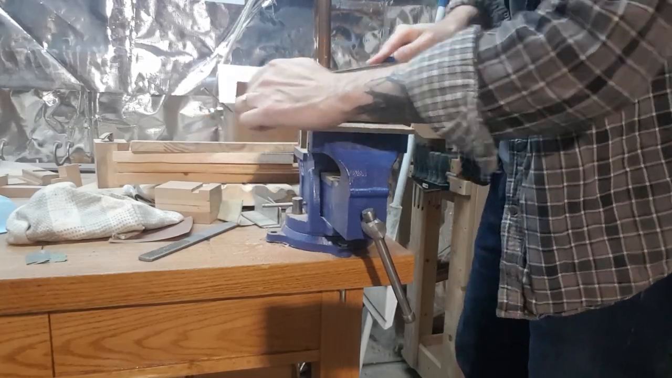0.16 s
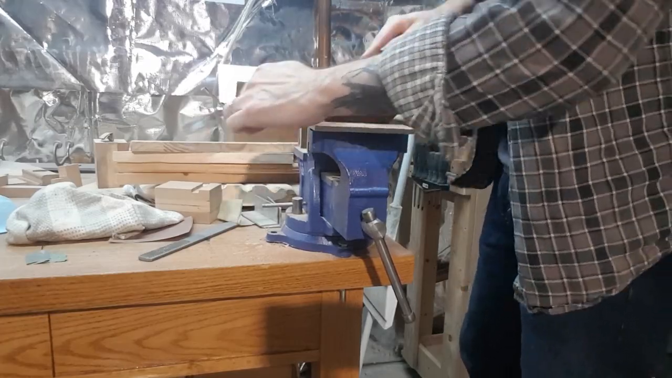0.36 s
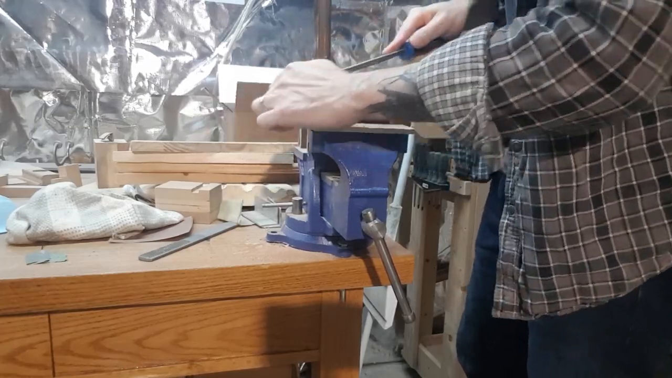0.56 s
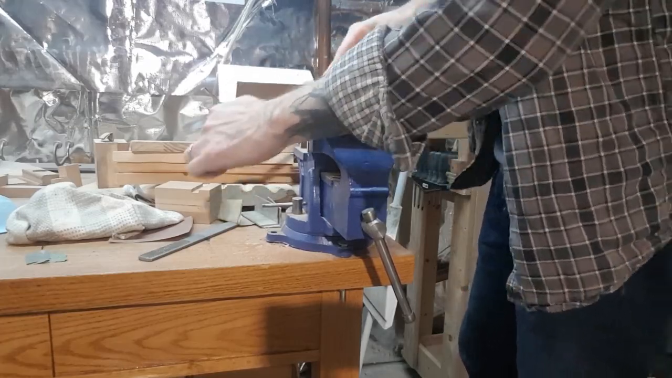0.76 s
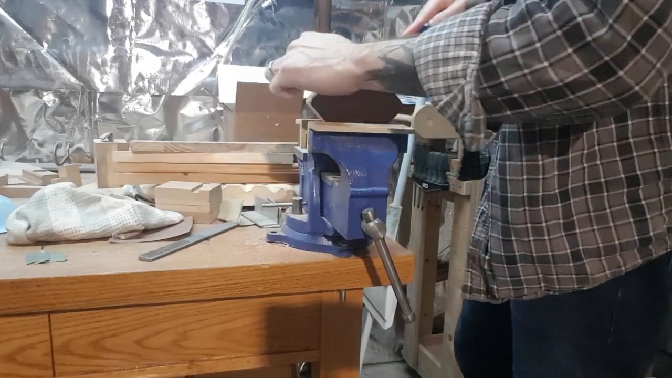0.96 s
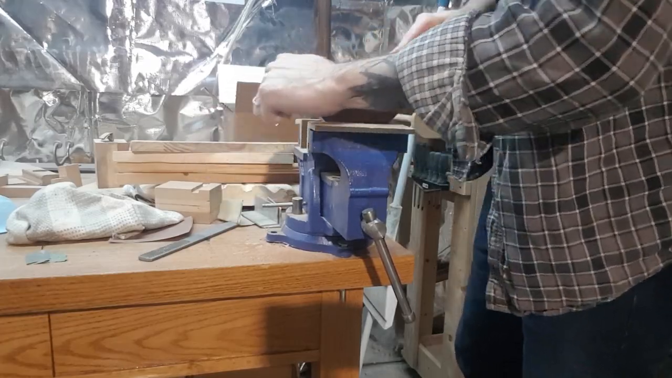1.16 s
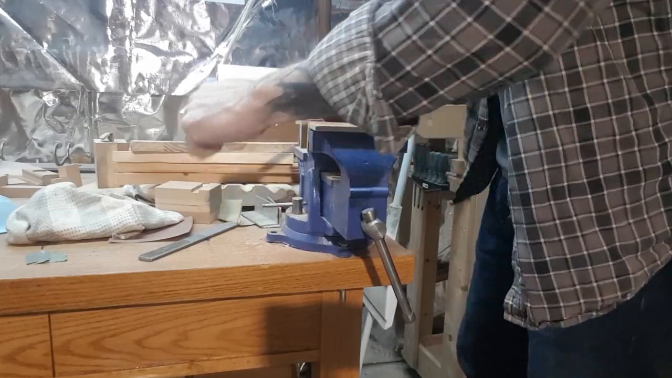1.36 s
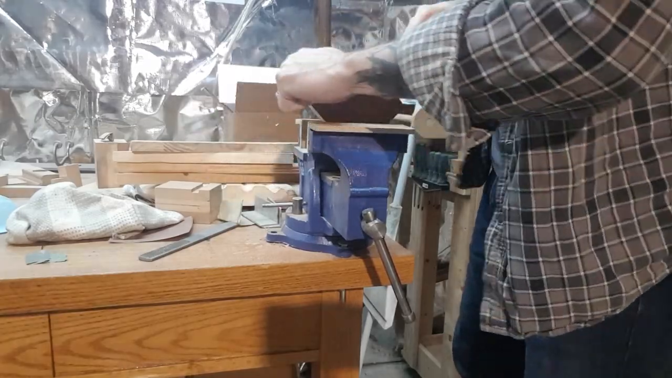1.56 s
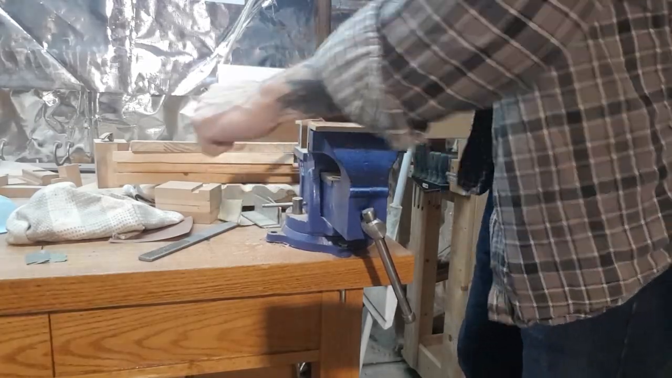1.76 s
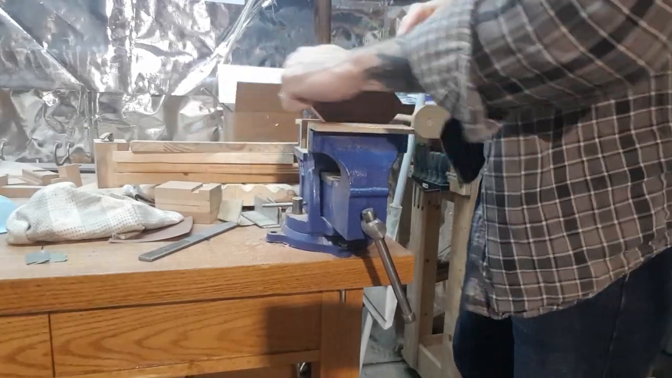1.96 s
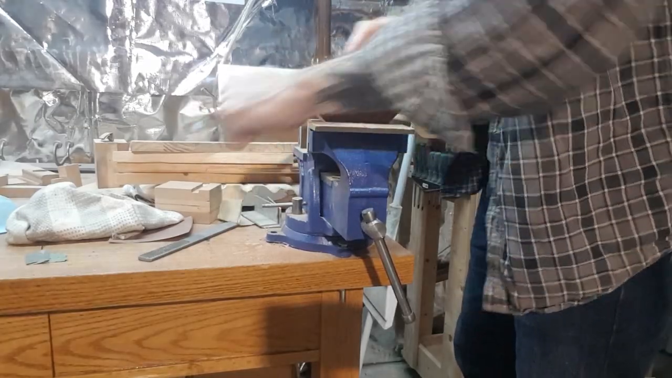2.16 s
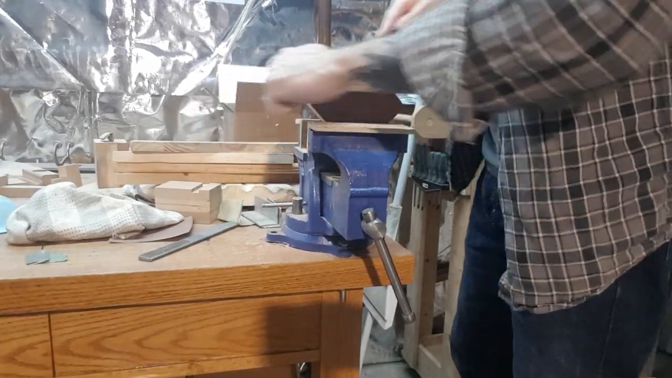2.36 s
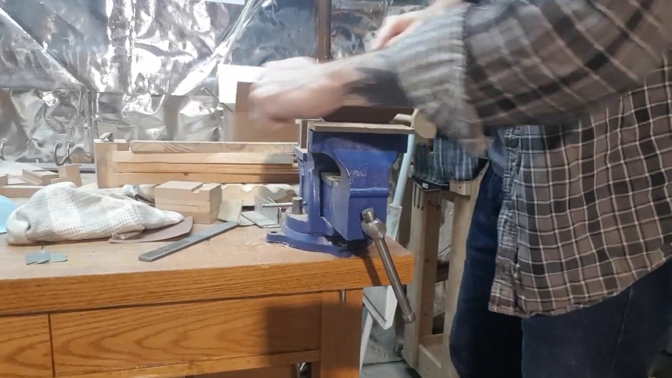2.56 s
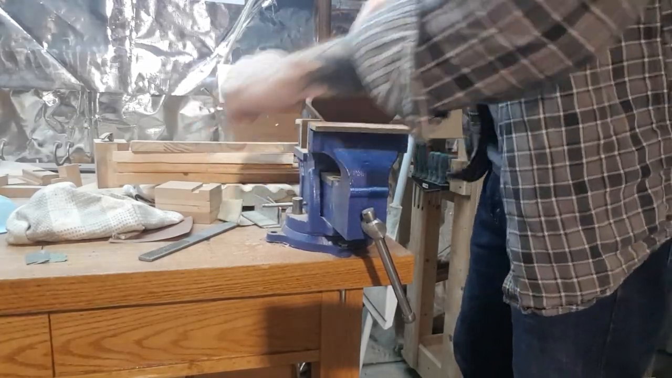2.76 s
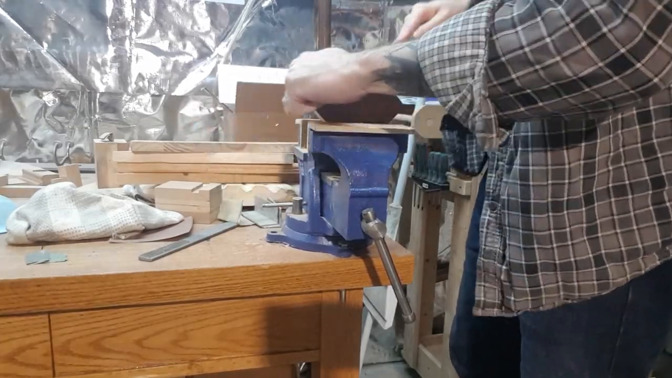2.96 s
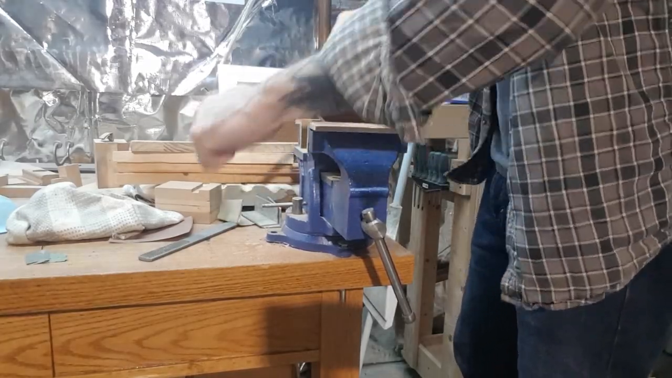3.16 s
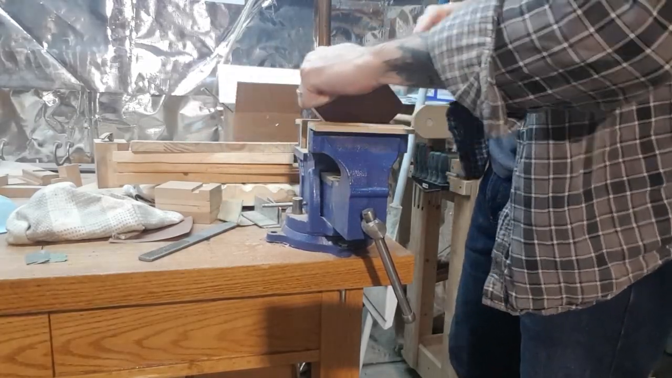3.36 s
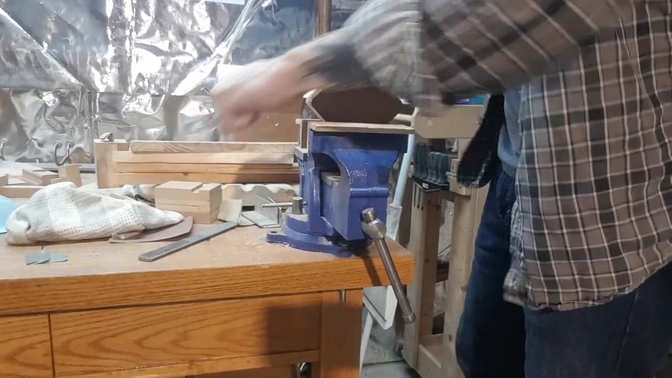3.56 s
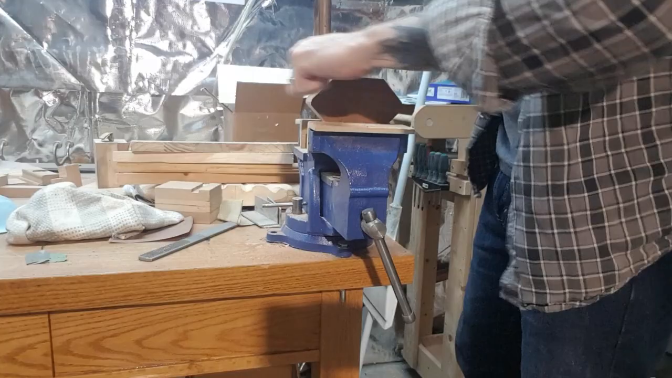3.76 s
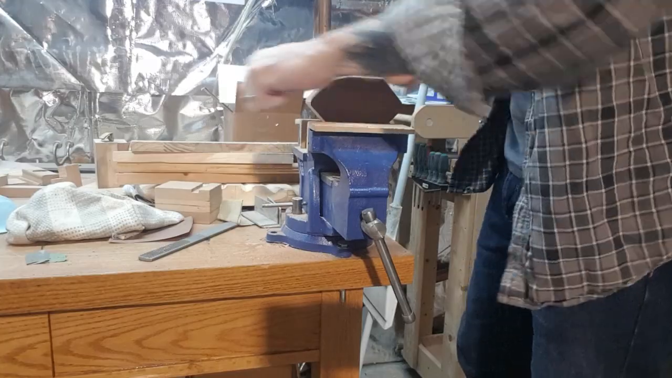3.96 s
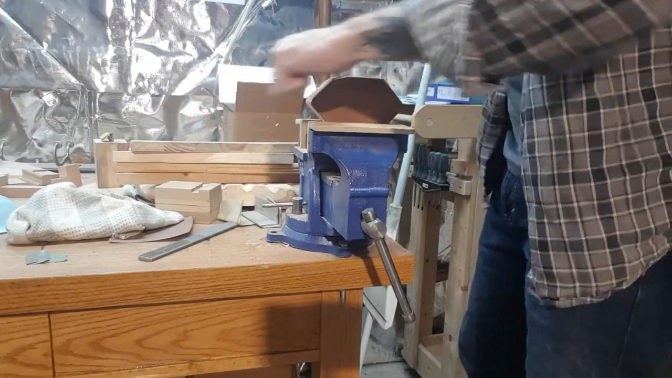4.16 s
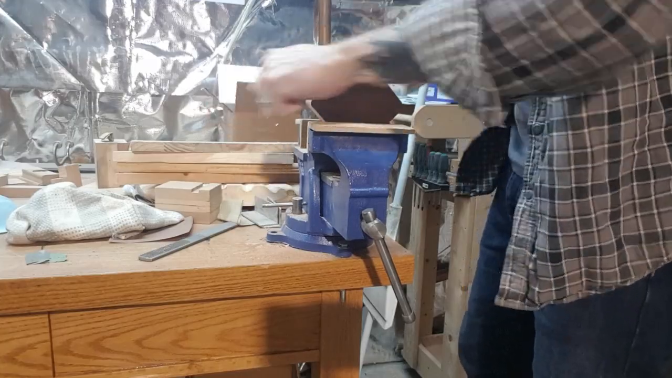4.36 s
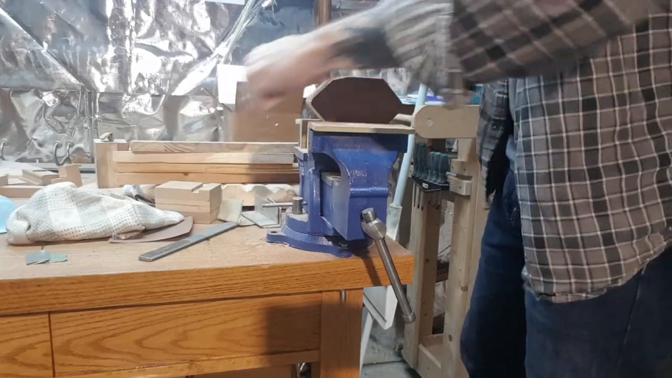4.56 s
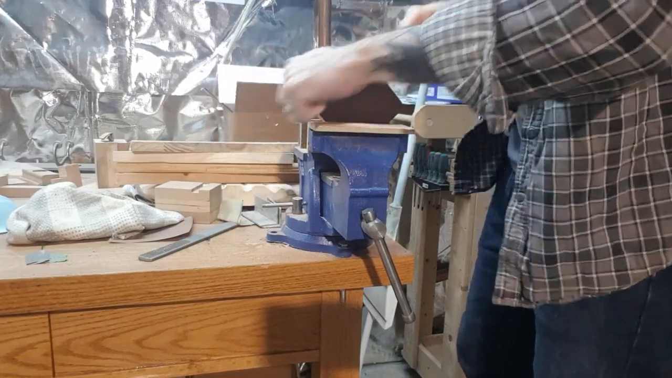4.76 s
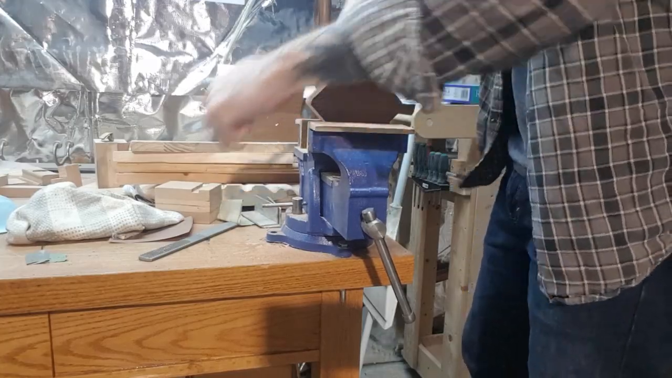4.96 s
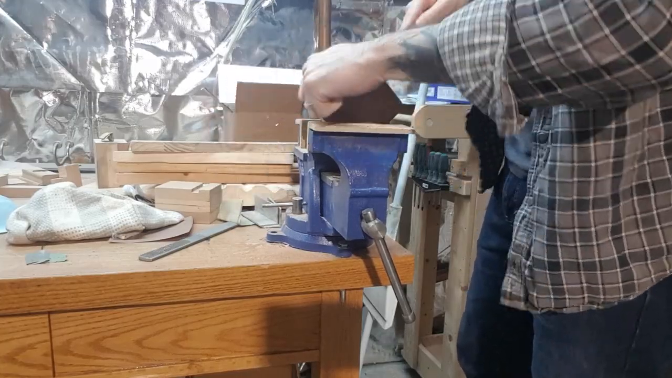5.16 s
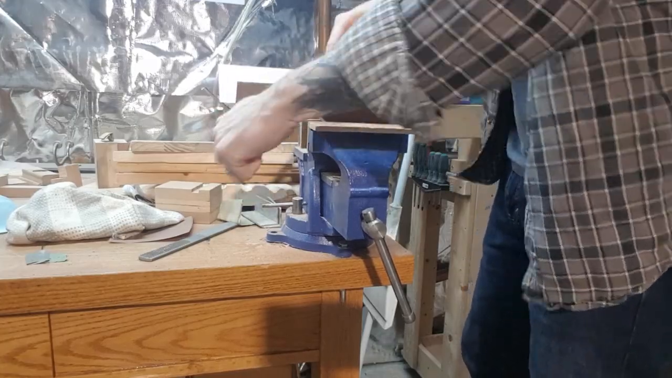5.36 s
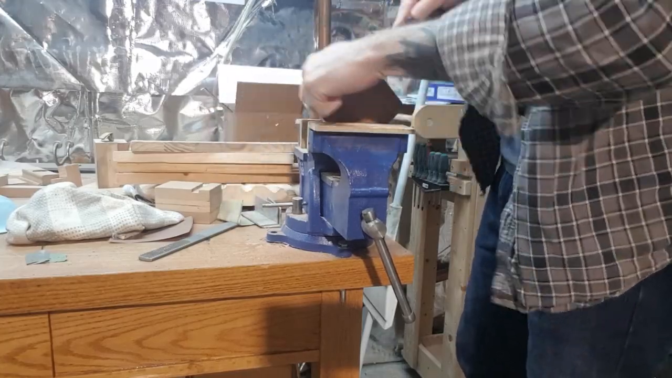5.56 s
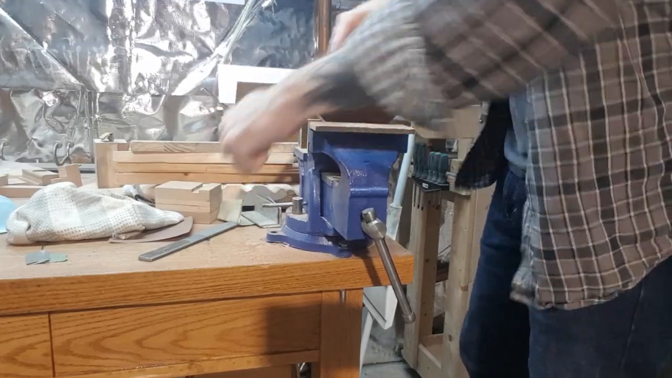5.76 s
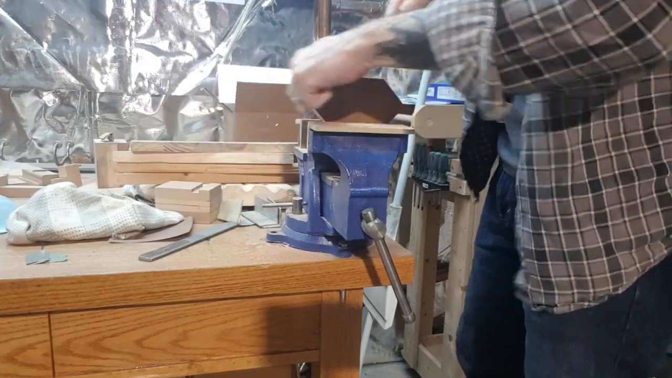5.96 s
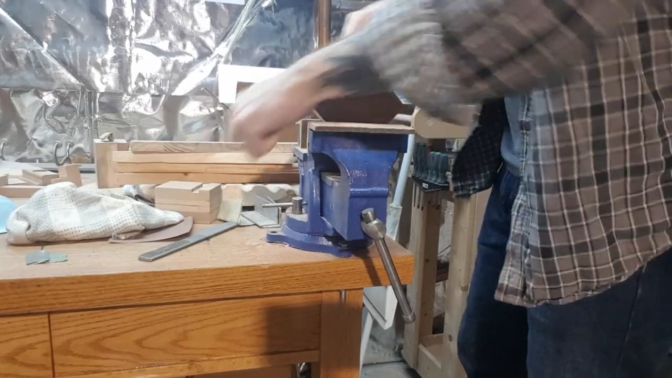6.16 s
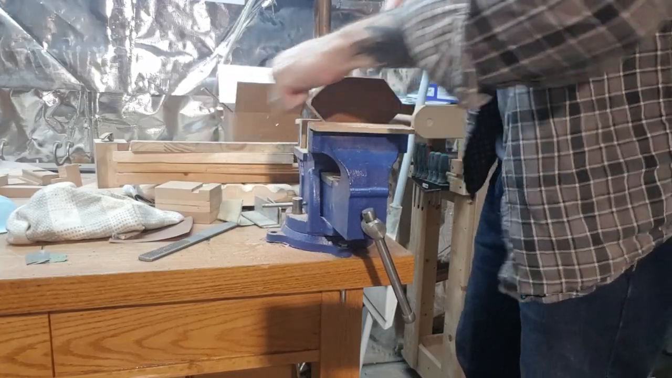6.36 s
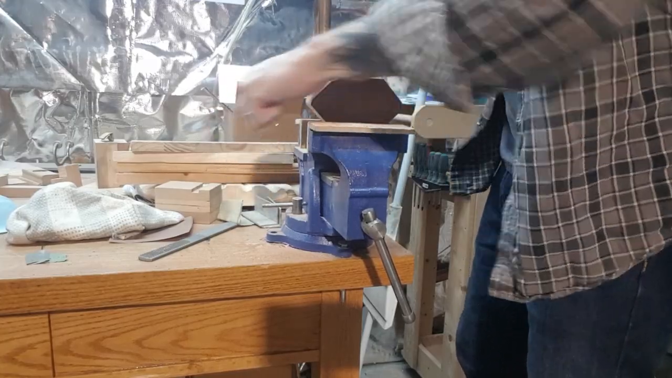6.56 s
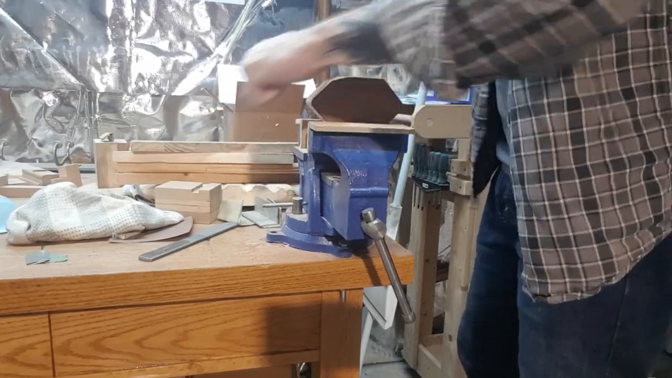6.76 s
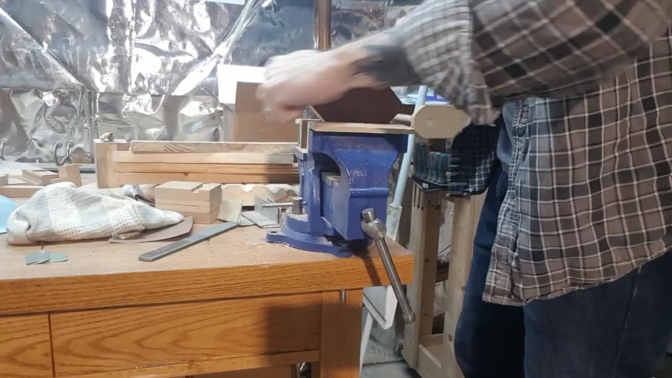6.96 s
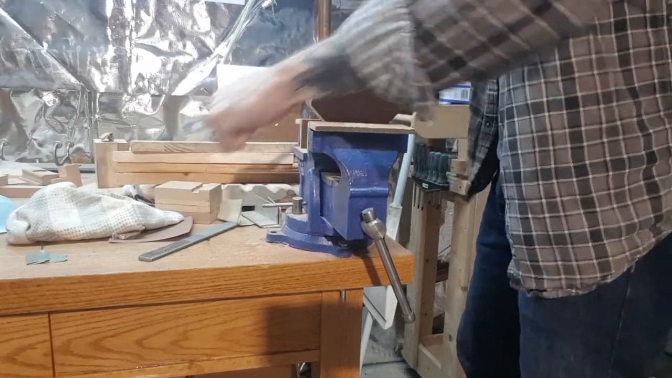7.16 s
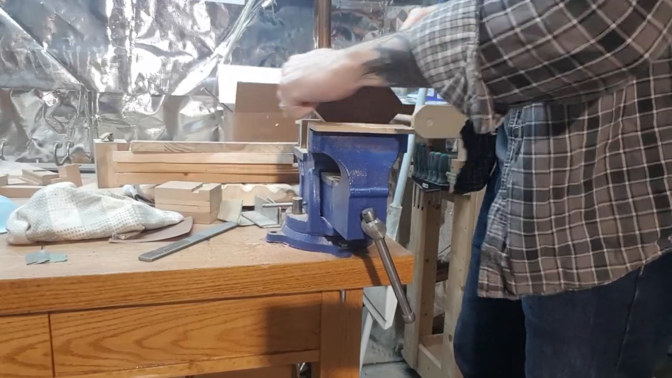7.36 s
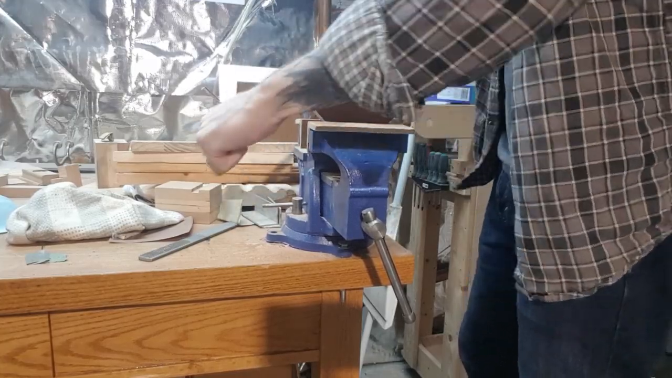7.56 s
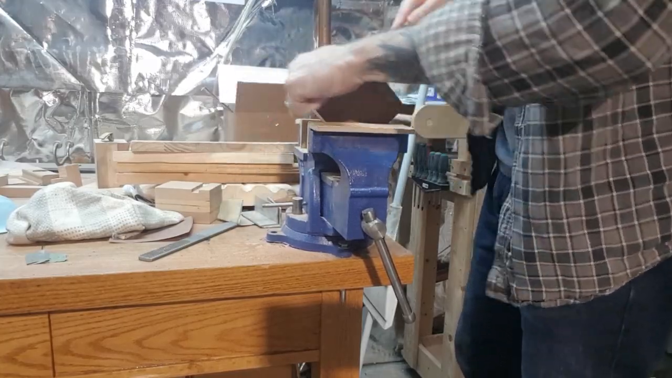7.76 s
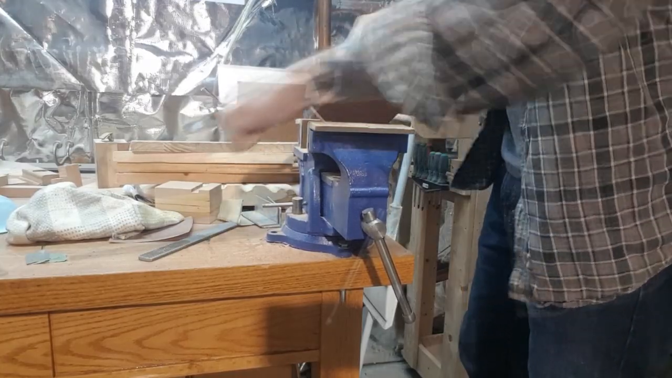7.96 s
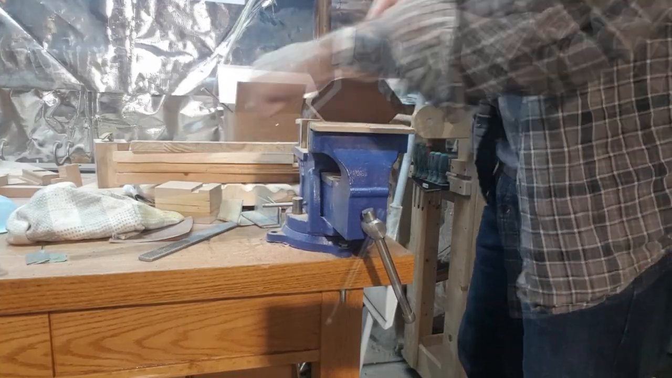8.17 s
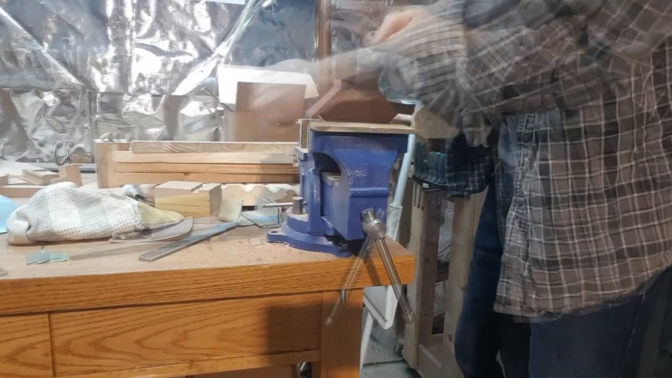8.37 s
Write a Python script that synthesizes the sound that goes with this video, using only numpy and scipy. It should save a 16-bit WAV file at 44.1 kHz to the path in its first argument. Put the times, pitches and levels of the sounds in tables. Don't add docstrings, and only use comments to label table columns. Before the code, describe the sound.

Steady back-and-forth filing on wood in a small workshop: hollow knock, short coarse rasp, brief pause, about two strokes a second.

```python
import sys
import numpy as np
from scipy import signal
from scipy.fft import rfft, irfft
from scipy.io import wavfile
from scipy.ndimage import uniform_filter1d

SR = 44100
rng = np.random.default_rng(int(sys.argv[2]) if len(sys.argv) > 2 else 0)


def transcribe(signal):
    frames = np.atleast_2d(signal).T
    limited = np.clip(frames, -1, 1)
    pcm = np.round(limited * 32767).astype(np.int16)
    wavfile.write(sys.argv[1], SR, pcm)


def field_ratio(decibels):
    return 10 ** (np.asarray(decibels, dtype=float) / 20)


N = 374850

# f/Hz, density level/dB
AIR_COLOUR = [(15, -69), (25, -26), (73, -18), (86, -3), (107, 2), (129, -5), (253, -51), (763, -22),
              (1030, -15), (9590, -35), (15600, -34)]
# f/Hz, likeness [0..1]
EAR_LIKENESS = [(60, .98), (300, 0.92), (700, 0.2), (1500, 0.07), (15000, .05)]
# f/Hz, t60/s
ROOM_DECAY = [(100, 0.83), (500, 0.22), (2000, 0.3), (6000, 0.2), (15000, 0.47)]
# t/s, level/dB
CHIRPS = [
    (1.3994, -78),
    (1.4755, -67),
    (1.5938, -77),
    (1.95, -73),
    (3.6651, -71),
    (3.7693, -72),
    (4.1275, -75),
    (4.2298, -82),
    (4.5386, -67),
]
# t/s, level/dB
PUSHES = [(.21, -49), (.33, -47), (.66, -40), (1.2, -46), (1.73, -38.5), (2.08, -44), (2.2, -49),
          (2.63, -36.5), (3.05, -49), (3.15, -40.5), (3.62, -47), (3.93, -46.5), (4.05, -56), (4.45, -40),
          (4.66, -46), (4.9, -42), (5.25, -45), (5.74, -38), (6.08, -49), (6.22, -42), (6.67, -45),
          (6.94, -60), (7.05, -48), (7.15, -66), (7.49, -33), (7.98, -41), (8.36, -59), (8.49, -46)]
# f/Hz, width/Hz, level/dB, left minus right level/dB
LEG_MODES = [(49, 8, -10.5, -12), (56.4, 7.3, 5, 1.5), (72.2, 74, 1.5, 2)]
# f/Hz, width/Hz, level/dB, left minus right level/dB
APRON_MODES = [(256.3, 7.3, 2.5, 2.2), (346, 25, -1.5, 2), (468, 59, 0, 2)]
# f/Hz, width/Hz, level/dB, left minus right level/dB
HANDLE_MODES = [(796, 4.9, -11, 0), (1993, 5.1, -21, 0.043)]
# f/Hz, width/Hz, level/dB, left minus right level/dB
FACE_MODES = [(722, 25, -4, 1.4), (1080, 17, -10, 3), (817, 73, -12.5, 2.5)]
# f/Hz, width/Hz, level/dB, left minus right level/dB
JAW_MODES = [(372.3, 10, -5, 1.5), (458, 35, -5.5, 1.5)]
# f/Hz, width/Hz, level/dB, left minus right level/dB
BODY_MODES = [(58, 20, -21, 0), (110, 15, -16, 1), (135, 15, -12, 0), (225, 20, -15, 1), (260, 20, -7, 2),
              (287, 20, -10, 2), (355, 25, -10, 2), (410, 18, -4, 3), (435, 22, -3, 5), (490, 25, -9, -3),
              (567, 30, -13, 1), (650, 25, -7, 10), (685, 25, -3, 4), (745, 25, 0, 0), (773, 25, -4, -5),
              (843, 28, -5, 6), (885, 30, -8, 0), (975, 30, -8, 4), (1027, 25, -5, 9), (1057, 20, -6, 0),
              (1182, 40, -14, 6), (1574, 50, -15, 4), (1970, 50, -19, 5), (2090, 90, -22, 1),
              (2270, 50, -24, 4), (2980, 200, -27, 0), (3490, 250, -23, 0), (3900, 250, -25, 1),
              (6550, 300, -32, -3), (13000, 900, -45, 0)]
# f/Hz, width/Hz, level/dB, left minus right level/dB
DRAWER_MODES = [(195, 11, -14, .1), (519.8, 9.2, -7.5, 0.12), (1358, 140, -23.5, 3.6), (1509, 48, -18, 2.1),
                (1675, 82, -19, 1.1), (1750, 88, -22.5, 2.5)]
# f/Hz, density level/dB
SCRAPE_COLOUR = [(1350, -39.5), (2200, -1), (2600, -2.5), (2900, 0.5), (3570, -8), (4200, -10),
                 (4500, -11.5), (6060, -21), (6610, -19.5), (7460, -19.5), (9040, -28), (11000, -28),
                 (13200, -35), (15600, -27)]
# t/s, blow level/dB, steel tick level/dB re blow, vise jaws level/dB re blow
LANDINGS = [(0.168, -27.5, -34, -5.5), (0.509, -32.5, -21, -4.5), (1.117, -32.5, -25, -9.5),
            (1.613, -36, -28, -6.5), (2.038, -32.5, -26, -1.5), (2.458, -22.5, -31, -6),
            (2.954, -26, -28, -6), (3.409, -34, -24, -7.5), (3.863, -23, -41, -12),
            (4.3, -31.5, -23.5, -7.5), (4.724, -24, -27.5, -9.5), (5.192, -22, -29, -17),
            (5.625, -31.5, -26, -14), (6.056, -24.5, -31, -12.5), (6.475, -28.5, -35, -6),
            (6.933, -19.5, -32.5, -9.5), (7.372, -28.5, -32, -6), (7.853, -29, -28, -18),
            (8.3, -28, -28.5, -7)]
# full cut t/s, lift t/s (both from landing), full pressure level/dB,
# first touch level/dB, bite level/dB re pressure
STROKES = [ (0.013, 0.13, -24.5, -21, -21), (0.13, .24, -24, -41, -15.5), (0.12, 0.23, -24, -37, -16.5),
           (.1, 0.17, -22.5, -43, -15), (.11, 0.19, -21.5, -39, -15.5), (0.13, 0.24, -24, -41, -13.5),
           (0.12, 0.19, -22.5, -40, -13.5), (0.11, 0.2, -23.5, -43.5, -14.5), (0.11, 0.19, -24, -39.5, -15),
           (0.099, 0.18, -22, -38.5, -15), (0.11, 0.2, -23, -38, -13), (0.11, 0.17, -22, -33.5, -13.5),
           (0.095, 0.17, -22, -47, -13.5), (0.092, 0.15, -22, -41.5, -12.5),
           (0.11, 0.19, -23.5, -40, -12.5), (0.12, 0.18, -22.5, -36.5, -15.5),
           (0.098, .19, -24.5, -37, -15), (0.11, .17, -24.5, -39.5, -16), (0.12, 0.87, -29, -42.5, -18.5)]
GRIP_TIMES = [0.019, .11, 0.12, 0.085, 0.089, 0.11, 0.1, 0.1, .1, 0.097, .1, 0.083, 0.088, 0.082, 0.098,
              0.079, 0.091, 0.072, 0.08]
# start t/s, length t/s, pressure level/dB, bench shake level/dB
DRAGS = [(0.0, 0.11, -34, -33.5), (0.358, 0.054, -33.5, -32.5), (0.793, 0.036, -50, -36),
         (1.437, 0.097, -57, -47.5), (1.888, 0.011, -62, -39), (2.855, .03, -72, -59),
         (3.22, 0.063, -53, -37.5), (3.324, 0.022, -57, -49), (3.73, 0.031, -68, -62),
         (4.62, 0.084, -71, -61), (4.988, 0.086, -51, -39.5), (6.322, .03, -52, -57),
         (6.395, 0.086, -60, -72), (7.66, .03, -62, -47), (8.21, 0.069, -63, -66)]


def read(points, hz):
    f, value = np.transpose(points)
    return np.interp(np.log(hz + 1), np.log(f + 1), value)


def filtered(x, order, hz, kind="low"):
    return signal.sosfilt(signal.butter(order, hz, kind, fs=SR, output="sos"), x)


def two_ears(left, other, hz):
    same = np.clip(read(EAR_LIKENESS, hz), 0, 1).reshape((-1,) + (1,) * (left.ndim - 1))
    return np.array([left, same * left + np.sqrt(1 - same ** 2) * other])


def air():
    hz = np.fft.rfftfreq(N, 1 / SR)
    left, other = rfft(rng.standard_normal((2, N)))
    x = irfft(two_ears(left, other, hz) * field_ratio(read(AIR_COLOUR, hz)), N)
    return field_ratio(-62.5) * x / x.std()


def room(x):
    taps = np.zeros((2, SR // 2))
    at = np.arange(140, SR // 2 - 20, 20) + rng.integers(0, 20, (2, (SR // 2 - 141) // 20))
    np.put_along_axis(taps, at, rng.choice([-1., 1.], at.shape), 1)
    hz, t, z = signal.stft(taps, SR, nperseg=256)
    decay = field_ratio(-60 * t / read(ROOM_DECAY, hz)[:, None])
    tail = signal.istft(two_ears(z[0], z[1], hz) * decay, SR, nperseg=256)[1]
    return signal.fftconvolve(x.mean(0)[None], tail / np.linalg.norm(tail[0]), axes=1)[:, :N]


def take_turns(k, per_s):
    turn = np.pi * per_s * np.arange(N) / SR
    return np.sqrt(2 / 3) * abs(np.cos(turn + k * np.pi / 3))


def workshop(x):
    return sum(room(take_turns(k, per_s=0.904) * x) for k in range(3))


def clumps(depth_db, size):
    slow = uniform_filter1d(uniform_filter1d(rng.standard_normal(N), size), size)
    return field_ratio(depth_db * slow / slow.std())


def chirps(chirp_hz=8200, rise_s=0.011):
    t, starts = np.arange(3000) / SR, np.zeros(N)
    at, db = np.transpose(CHIRPS)
    starts[np.round(at * SR).astype(int)] = field_ratio(db - 7)
    rise = t / rise_s
    whistle = np.sin(2 * np.pi * chirp_hz * t) * rise * np.exp(1 - rise)
    return clumps(depth_db=9, size=150) * signal.oaconvolve(starts, whistle)[:N]


def ring(modes, spot_db=0, size=6144, skew_hz=1400):
    hz, width, db, pan_db = np.transpose(modes)
    t = np.arange(size)[:, None] / SR
    fade = np.exp(-np.pi * width * t) * width * field_ratio(db) * (-1.) ** np.arange(len(hz))
    skew = np.minimum(hz / skew_hz, 1.2) * np.cos(2.2 * np.arange(len(hz)))
    phase = 2 * np.pi * hz * t
    ears = []
    for side in (1, -1):
        ears.append((fade * np.sin(phase - side * skew / 2)) @ field_ratio(spot_db + side * pan_db / 2))
    return np.array(ears) / np.linalg.norm((fade * np.sin(phase)).sum(1))


def struck(force, modes, size=4096):
    return signal.oaconvolve(force[None], ring(modes, size=size), axes=1)[:, :N]


def through(force, modes, shift_db=4, size=6144):
    out = np.zeros((2, N))
    spots = rng.standard_normal((3, len(modes)))
    for k, spot in enumerate(spots - spots.mean(0)):
        share = take_turns(k, per_s=2.8)
        out += signal.oaconvolve((share * force)[None], ring(modes, shift_db * spot, size), axes=1)[:, :N]
    return out


def rocking_bench(force):
    t, sway_db = np.arange(N) / SR, np.full(N, -64.0)
    in_db_per_s, out_db_per_s = 219, 248
    for s, db in PUSHES:
        sway_db = np.maximum(sway_db, db - np.maximum(in_db_per_s * (s - t), out_db_per_s * (t - s)))
    return filtered(struck(force * field_ratio(sway_db), LEG_MODES), 2, 110)


def landings(db, bounce_s=0.016, bounce_db=-19.0):
    force = np.zeros(N)
    at = np.array([row[0] for row in LANDINGS])
    force[np.round(at * SR).astype(int)] = field_ratio(db)
    force[np.round((at + bounce_s) * SR).astype(int)] = -field_ratio(db + bounce_db)
    return force


def knocks(blow_db, jaws_db):
    face = struck(landings(blow_db + 20, bounce_db=-0.5), FACE_MODES)
    jaws = struck(landings(blow_db + jaws_db + 29, bounce_db=2.0), JAW_MODES)
    return filtered(face + jaws, 4, [320, 1150], "band")


def since_landing(at):
    t = np.arange(N) / SR
    which = np.maximum(np.searchsorted(at, t, "right") - 1, 0)
    return which, t - at[which]


def settling(ramp_s=0.13):
    since = since_landing(np.array([-1] + [row[0] for row in LANDINGS]))[1]
    return np.clip(0.84 + since / ramp_s, 0, 1)


def strokes():
    which, since = since_landing(np.array([row[0] for row in LANDINGS]))
    full, lift, top_db, touch_db, bite_db = np.array(STROKES)[which].T
    along = np.clip((since - full) / (lift - full), 0, 1)
    after = np.maximum(since - lift, 0)
    rise_s, lift_db_per_s, lift_drop_db, trail_db_per_s = 0.087, 287.5, 38, 79
    rising = touch_db + (top_db - touch_db) * np.clip(1 + (since - full) / rise_s, 0, 1)
    trail = -lift_drop_db - trail_db_per_s * (after - lift_drop_db / lift_db_per_s)
    fading = np.maximum(-lift_db_per_s * after, trail)
    pressure = rising + 0.5 * np.sin(np.pi * along) + fading

    grip = np.array(GRIP_TIMES)[which]
    cutting = np.clip((since - grip) / (lift - grip), 0, 1)
    gripping = top_db + bite_db + 328 * np.minimum(since - grip, 0) + 2 * np.sin(np.pi * cutting)
    skating = touch_db - 17.5 - 10.5 * np.clip(1 - since / 0.032, 0, 1)
    letting_go = np.minimum(fading, -np.minimum(600 * after, 7))
    bite = np.maximum(gripping, skating) - 2.5 * cutting + letting_go
    residue = -56.5 - 70 * after
    bite = np.where(after > 0, np.maximum(bite, residue), bite)

    bench = -36 + 0.5 * (rising - top_db) - 154 * after
    return [np.where(since < 0, -99, db) for db in (pressure, bite, bench)]


def hand():
    t = np.arange(N) / SR
    pressure, bite, bench = strokes()
    apron = bench - 6
    for start, length, db, shake_db in DRAGS:
        edge = -397 * np.maximum(np.maximum(start - t, t - start - length), 0)
        pressure = np.maximum(pressure, db + edge)
        apron = np.maximum(apron, shake_db + edge)
        bench = np.maximum(bench, shake_db - 3.5 + edge)
        bite = np.maximum(bite, db - 18.5 + edge)
    return pressure, bite, bench, apron


def tears(spread_db=3.5, rub=0.57, tears_per_s=1500):
    snaps = (rng.random(N) < tears_per_s / SR) * field_ratio(spread_db * np.minimum(rng.exponential(1, N), 3.6))
    snaps *= rng.choice([-1., 1.], N)
    force = snaps / snaps.std() + rub * rng.standard_normal(N)
    return force / force.std()


def grit():
    log_gain = np.log(field_ratio(read(SCRAPE_COLOUR, abs(np.fft.fftfreq(2048, 1 / SR)))))
    taps = np.fft.ifft(np.exp(np.conj(signal.hilbert(log_gain)))).real[:1024]
    return taps / np.linalg.norm(taps)


def scrape(bite_db, width=0.95, pan_db=2):
    both = tears(spread_db=3.5, rub=0.31)
    apart = width * tears(spread_db=7.0, rub=0.67)
    ears = np.array([both + apart, both - apart]) * field_ratio([[pan_db / 2 - 3.5], [-pan_db / 2 - 1.5]])
    dust = ears * clumps(depth_db=1.8, size=500) * field_ratio(bite_db - 2.5)
    return signal.oaconvolve(dust, grit()[None], axes=1)[:, :N]


def ringing_steel(force, bite_db, tick_db, modes):
    tick = filtered(landings(tick_db + 25, bounce_db=-9.0), 2, 4800)
    singing = force * field_ratio(bite_db - 5 + 0.5 * np.minimum(bite_db + 52.5, 0))
    return filtered(through(singing + tick, modes, size=1024), 2, 2200, "high")


def filing():
    force = tears()
    pressure_db, bite_db, bench_db, apron_db = hand()
    blow_db, tick_db, jaws_db = np.transpose(LANDINGS)[1:]
    modes = sorted(BODY_MODES[1:] + DRAWER_MODES)
    bench = [m for m in modes if m[0] < 310]
    block = [m for m in modes if 310 < m[0] < 2600]
    steel = [m for m in modes if m[0] > 2600]

    wood = through(force * field_ratio(bench_db - 5) + landings(blow_db + 5), bench)
    cutting = force * settling() * field_ratio(pressure_db - 4)
    wood += filtered(through(cutting + landings(blow_db + 13), block), 2, 290, "high")
    wood += knocks(blow_db, jaws_db)
    wood = filtered(wood, 3, [95, 2600], "band")
    wood += struck(force * field_ratio(pressure_db - 29), HANDLE_MODES, size=16384)
    wood += struck(force * field_ratio(apron_db - 7.5), APRON_MODES)
    wood += rocking_bench(force)
    return wood, ringing_steel(force, bite_db, blow_db + tick_db, steel) + scrape(bite_db)


def scene():
    wood, steel = filing()
    echo = workshop(field_ratio(-7.5) * wood + field_ratio(-5) * steel) * field_ratio([[-.3], [.3]])
    return wood + field_ratio(-1.5) * steel + echo + air() + chirps()


def band_limit(x):
    return signal.sosfilt(signal.butter(12, 15720, fs=SR, output="sos"), x)


def record(dry):
    heard = filtered(dry, 5, 46, "high")
    edge = signal.firwin(601, 15750, window=("kaiser", 9), fs=SR)
    mix = signal.oaconvolve(heard, edge[None], "same")
    return band_limit(mix)


dry = scene()
out = record(dry)
transcribe(out)
```